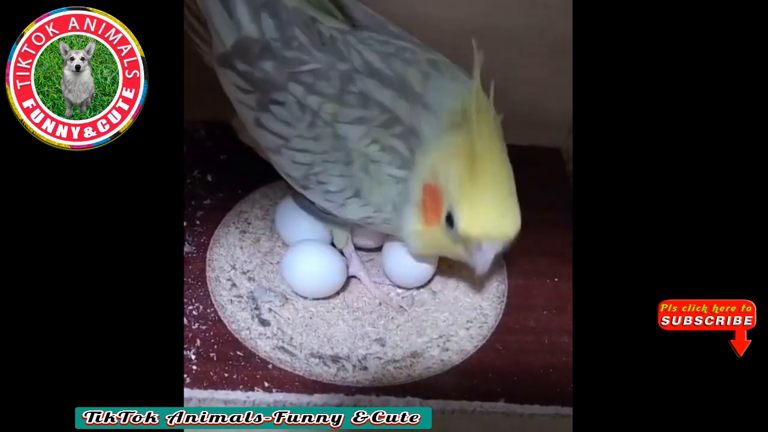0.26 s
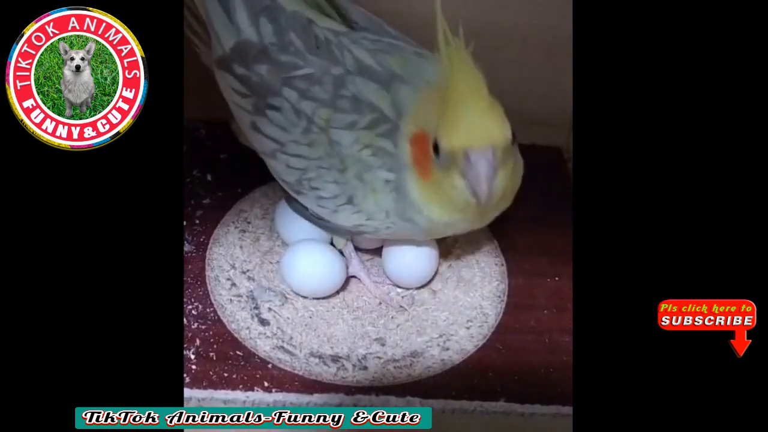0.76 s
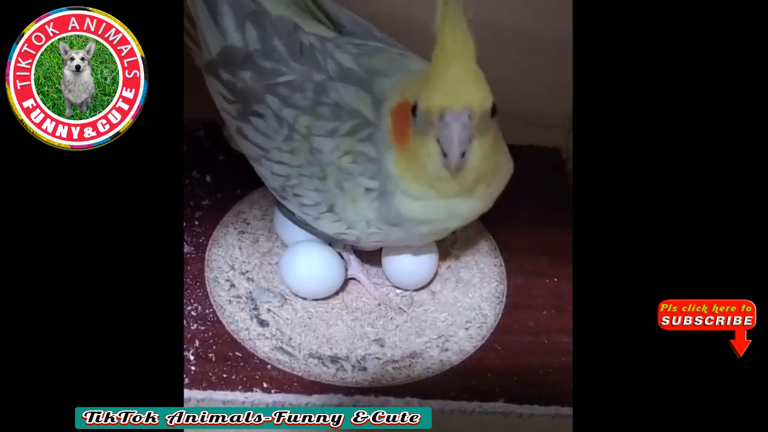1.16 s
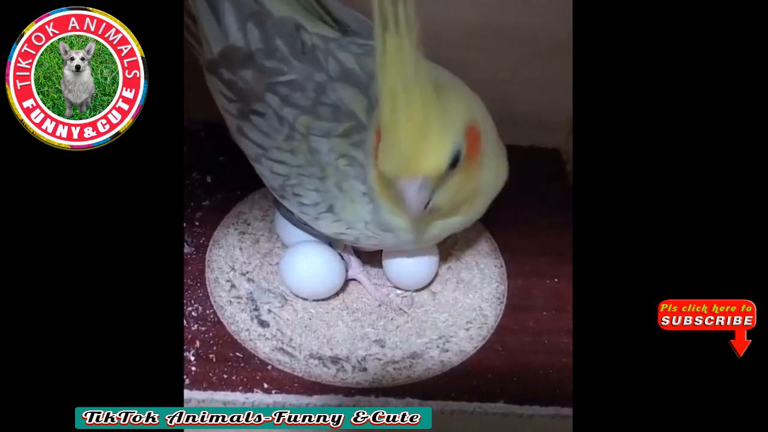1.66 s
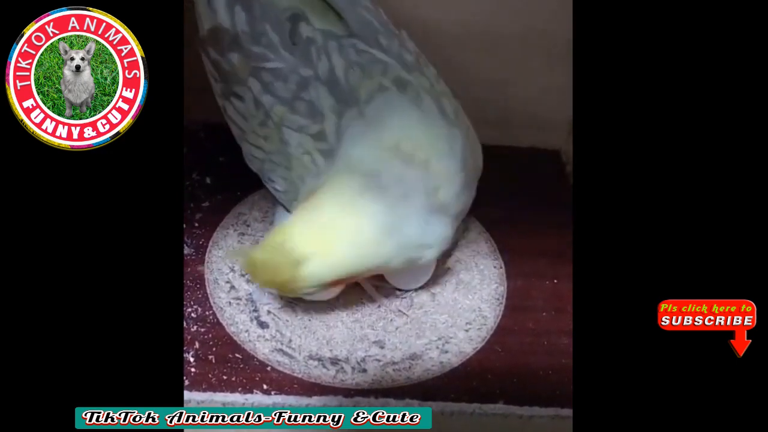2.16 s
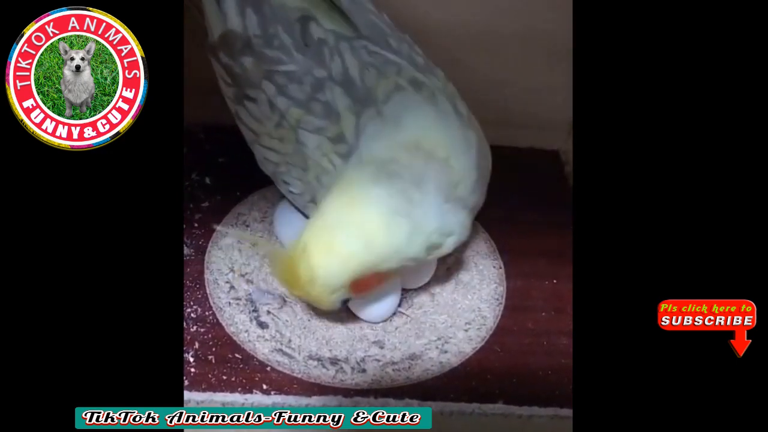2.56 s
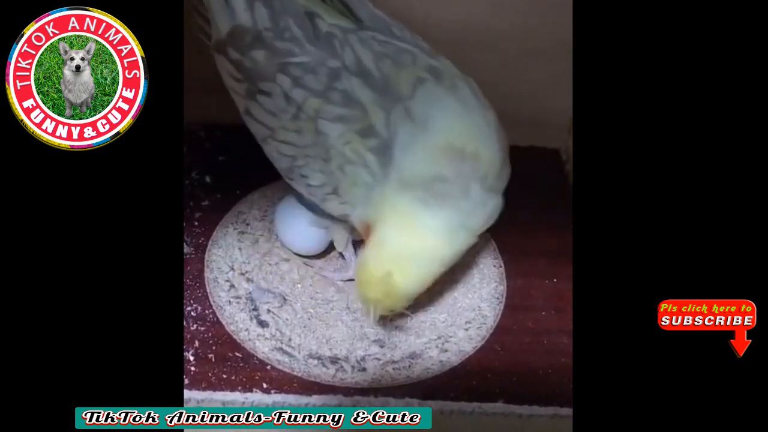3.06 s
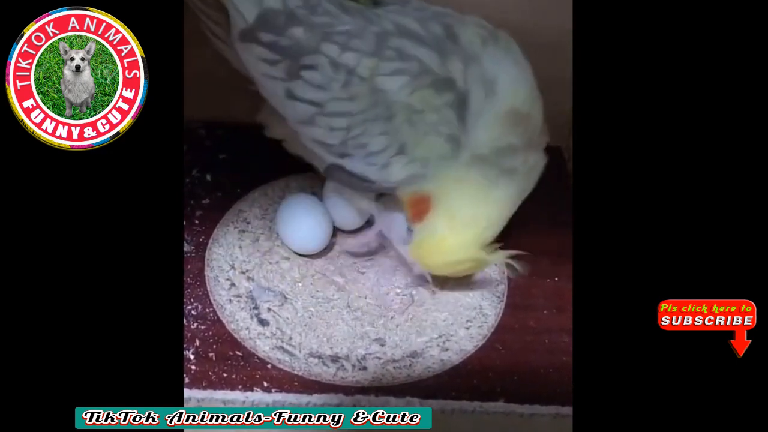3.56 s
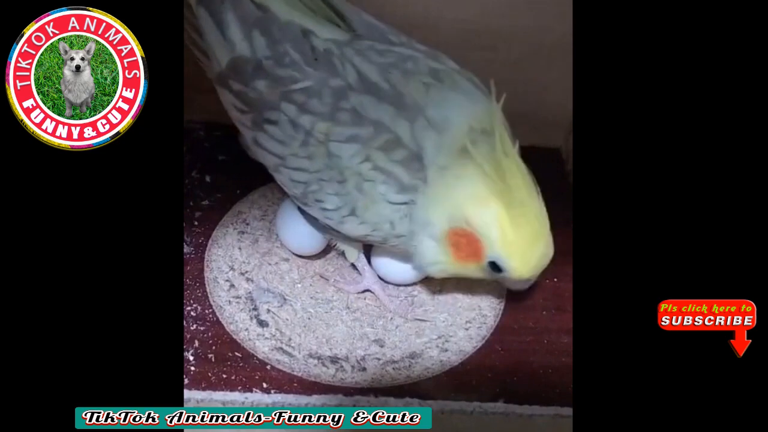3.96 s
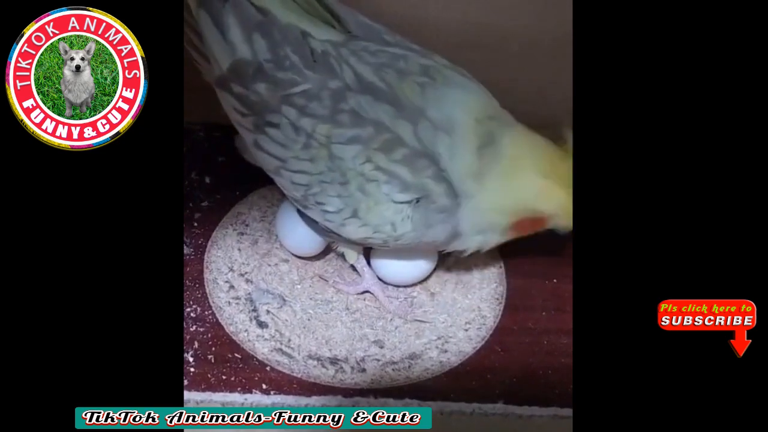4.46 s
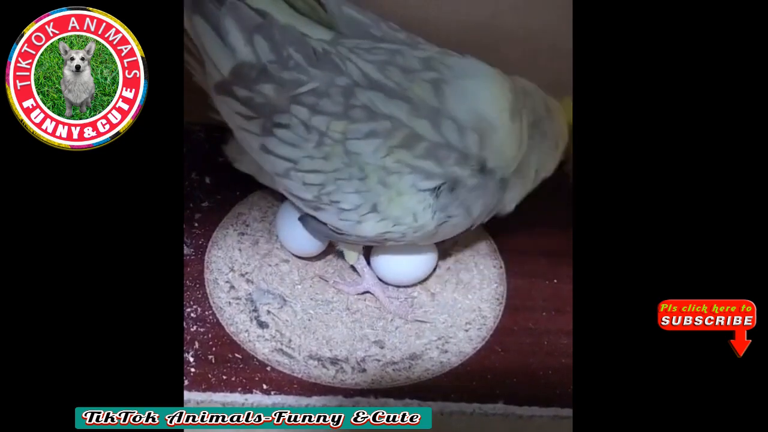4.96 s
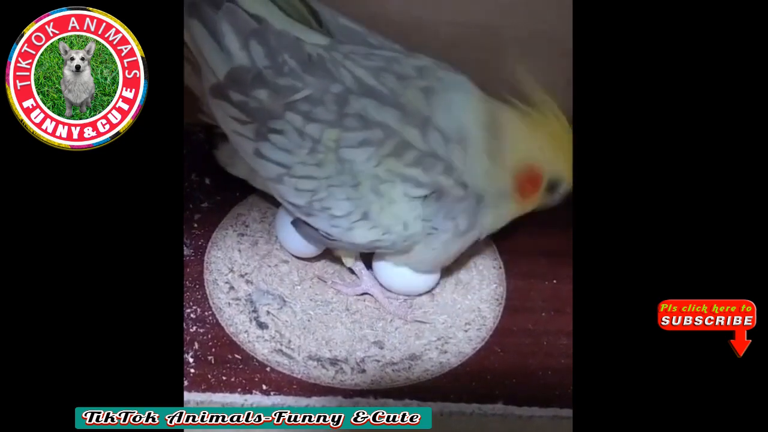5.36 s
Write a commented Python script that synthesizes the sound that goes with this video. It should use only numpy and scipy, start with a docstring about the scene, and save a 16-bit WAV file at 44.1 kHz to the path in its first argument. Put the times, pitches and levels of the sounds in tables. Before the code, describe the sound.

Short rising bird chirps, some leaping into piercing whistles, pause for over a second of quiet shuffling and clicks, then return briefly.

```python
"""A small, hard-walled room where a cockatiel chatters over its eggs, heard close up in stereo.
Each chirp is a gliding syrinx tone with overtones, and its own share of half-pitch buzz, rasp and hiss.
Decaying noise bursts with ringing tones make the beak and claw taps and the dull knocks on the stone slab.
Filtered noise makes the soft low thumps and, flickering, the foot scuffs and feather rustle,
over a faint hum and air."""
import sys
import numpy as np
from scipy import signal
from scipy.fft import rfft, irfft
from scipy.io import wavfile
from scipy.ndimage import uniform_filter1d

SR = 44100
rng = np.random.default_rng(int(sys.argv[2]) if len(sys.argv) > 2 else 0)


def bounce(signal):
    """Save signal as a 16-bit WAV file at the path given by the first command-line argument."""
    frames = np.transpose(np.atleast_2d(signal))
    limited = np.clip(frames, -1, 1)
    pcm = np.round(limited * 32767).astype(np.int16)
    wavfile.write(sys.argv[1], SR, pcm)


N = 247394
T = np.arange(N) / SR  # t/s
TOP_HZ = 15700  # the top is cut above this
AIR_DB = -75  # rms
HUM_HZ, HUM_DB = 76, -73

# Chirps, one row per note; some climbs leap into a whistle near 3 kHz. Levels come before the cockatiel() trims:
# [start t/s, full voice t/s, turn of the glide t/s, end t/s, start f/Hz, turn f/Hz, end f/Hz, level/dB,
#  against that level: soft lead-in level/dB, change by the end level/dB, second harmonic level/dB,
#  third level/dB, all higher ones level/dB, half-pitch lines level/dB;
#  undertone against the half-pitch lines level/dB, pitch flutter as a share of pitch, rasp level/dB]
CHIRPS = [ (-.02, -.012, 0, .015, 2280, 2260, 2000, -30, -9, -8, -2, -14, -28, -23, -26, .022, -22),
          (.048, .104, .155, .208, 1477, 1768, 1750, -21.5, -7, 0, -34, -43, -39, -31, -11, .01, -43),
          (.32, .35, .39, .4, 1361, 1913, 1913, -19, -9, -1, -13, -38, -30, -25, -28, .021, -32),
          (.52, .537, .576, .607, 1701, 2316, 2312, -20.5, -7, -7, 1, -5, -20, -44, -24, .005, -54),
          (.724, .735, .768, .797, 1748, 2377, 2452, -21.5, -6, -6, 3, -3, -19, -42, -17, .006, -42),
          (.826, .836, .877, .881, 1640, 2442, 2442, -20.5, -6, 0, -3, -8, -3, -24, -24, .02, -26),
          (.881, .89, .937, .994, 2844, 3216, 2855, -12.6, -8, 2, -17, -14, -23, -43, -8, .014, -33),
          (.99, .994, 1.01, 1.041, 2250, 2099, 1835, -19.5, -7, -4, -18, -15, -15, -22, -16, .031, -21),
          (1.065, 1.098, 1.128, 1.135, 1562, 2242, 2242, -19.3, -6, -0.5, -7, -13, -13, -16, -26, .026, -23),
          (1.135, 1.152, 1.175, 1.222, 2483, 2885, 2992, -16, -2, -4, -19, -16, -26, -24, -23, .015, -24),
          (1.215, 1.229, 1.236, 1.31, 2415, 2202, 1750, -15.2, -7, -7, -9, -15, -17, -23, -26, .027, -25),
          (1.436, 1.455, 1.497, 1.525, 1500, 1749, 1820, -19.4, -7, -10, -15, -39, -35, -24, -10, .013, -41),
          (1.628, 1.644, 1.671, 1.702, 1493, 1492, 1380, -19.5, -10, -9, -14, -30, -23, -18, -10, .01, -32),
          (1.853, 1.883, 1.896, 1.918, 1350, 1485, 1519, -21, -10, -9, -18, -30, -29, -17, -17, .013, -29),
          (2.098, 2.122, 2.148, 2.16, 1436, 1677, 1620, -21.5, -8, -2, 0, -17, -21, -27, -18, .011, -25),
          (2.294, 2.31, 2.319, 2.38, 2072, 2280, 2110, -20.5, -11, -6, 1, -12, -24, -48, -19, .005, -55),
          (2.5, 2.528, 2.56, 2.581, 1768, 2408, 2607, -17.7, -5, -4, -2, -6, -8, -24, -26, .02, -27),
          (2.581, 2.592, 2.648, 2.712, 2800, 3300, 2819, -12.8, -9, 2, -16, -13, -22, -42, -16, .016, -32),
          (2.716, 2.745, 2.763, 2.825, 1862, 2283, 2214, -23, -3, -2, -1, -12, -17, -29, -14, .01, -19),
          (2.958, 2.988, 3.042, 3.05, 1520, 1917, 1917, -19.5, -8, 0.5, -28, -36, -32, -25, -12, .014, -40),
          (3.189, 3.211, 3.215, 3.26, 1615, 1719, 1400, -20, -8, -2, -14, -37, -27, -21, -25, .015, -28),
          (3.411, 3.438, 3.456, 3.483, 1427, 1666, 1635, -21.5, -7, -2, -3, -21, -20, -24, -17, .008, -27),
          (4.808, 4.821, 4.826, 4.885, 1470, 1306, 1249, -27.5, -12, -12, -15, -38, -32, -25, -14, .015, -36),
          (4.973, 4.992, 5.039, 5.05, 1616, 2032, 2032, -22.2, -9, -1, 4, -4, -10, -36, -28, .011, -25),
          (5.08, 5.103, 5.173, 5.18, 1580, 2480, 2480, -17.5, -10, -2, -6, -13, -9, -19, -39, .04, -22),
          (5.17, 5.184, 5.215, 5.316, 2850, 3110, 2900, -13.3, -4, -5, -17, -15, -25, -17, -44, .01, -19),
          (5.357, 5.375, 5.428, 5.47, 1833, 2627, 2450, -23.5, -5, -6, 3, -5, -14, -18, -23, .025, -19)]
# Windpipe resonances, which favour the harmonics gliding through them: [f/Hz, level/dB]
WINDPIPE = [(1300, -3), (1500, 0), (1750, -2.5), (2300, 3.5), (3050, 4.3), (3450, -1), (3900, 5.7),
            (5300, 4.4), (6600, -4), (7500, -10), (9500, 1)]
# Throat and open beak, shaping high overtones and rasp: [f/Hz, relative level/dB]
THROAT = [(1250, -27), (1700, 5.5), (2400, -0.5), (3000, -0.5), (4500, 4.5), (6500, -1.5), (8000, -4.5),
          (9600, 0), (11000, -2), (12500, -5), (15500, -13)]
# Beak hiss that goes with the highest overtones: [f/Hz, relative level/dB]
HISS = [(5400, -7.5), (6800, 3), (8200, -5.5), (10500, 2.5), (12500, 1), (14000, -5.5), (15500, -13)]
# Mouth cavity over the whole voice, with a hollow near 8 kHz: [f/Hz, level/dB]
MOUTH = [(500, -2), (1100, -6), (1450, 0.5), (6800, -0.5), (7500, -3), (8300, -5.5), (9200, -1),
         (12800, -1.5), (14200, -4), (16000, -3)]
# Beak and claw taps: [t/s, tick peak level/dB]
TAPS = [(.254, -31), (3.983, -48), (4.572, -27), (4.619, -25), (4.752, -46), (4.836, -39), (4.931, -40)]
# Colour of the bright tick: [f/Hz, relative level/dB]
TAP_COLOUR = [(700, -24), (1500, -19.5), (3000, -13.5), (3800, -17), (4800, -6), (7000, -3.5),
              (10400, -0.5), (15500, -14.5)]
# Ring of the slab under a tap: [f/Hz, level against the tick's peak/dB, decay t/s]
TAP_MODES = [(796, -28, 0.0224), (1350, -25.5, 0.02), (2973, -32, 0.0078)]
# Dull knocks of eggs and feet on the slab: [t/s, thud peak level/dB, hollow ring level before its envelope/dB,
#  ring f/Hz]
KNOCKS = [(.16, -37, -33, 692), (.205, -35.5, -33.5, 742), (.267, -35, -43, 703),
          (3.915, -35, -45.5, 449.4), (3.944, -59, -52, 388), (4.014, -44, -54, 339.5),
          (4.062, -64, -49, 693), (4.234, -61, -52, 575), (4.29, -67, -58.5, 560.5),
          (4.438, -66, -59.5, 532), (5.562, -40, -32.5, 676.6)]
# Colour of the thud: [f/Hz, relative level/dB]
KNOCK_COLOUR = [(150, -18), (330, -8), (450, 0), (800, -2), (1300, -9), (3000, -30)]
# Soft low thumps, perhaps from handling: [start t/s, held t/s, level/dB]
THUMPS = [(.29, 0.043, -60), (1.48, .04, -67), (1.81, .04, -64), (2.28, 0.11, -62), (2.85, .1, -59),
          (3.2, 0.056, -63.5), (3.46, .04, -71.5), (4.94, .055, -44), (5.02, .07, -55.5),
          (5.55, 0.051, -55)]
# Colour of the thumps: [f/Hz, relative level/dB]
THUMP_COLOUR = [(18, -45), (30, -27), (134, 0), (216, 0), (262, -20), (308, -17), (400, -15.5),
                (520, -49.5), (880, -120)]
# Feet scuffing on the slab: [start t/s, held t/s, level/dB]
SCUFFS = [(0, 0.086, -56), (.2, 0.26, -48.5), (1.04, 0.025, -61), (1.48, 0.52, -67.5), (2.1, 0.37, -72),
          (2.84, .07, -46.5), (2.95, 0.33, -56.5), (3.33, .08, -57.5), (3.5, 0.19, -64.5),
          (3.92, 0.061, -60), (5.2, .03, -57.5), (5.5, .05, -53.5), (5.57, 0.027, -47)]
# Colour of the scuffs: [f/Hz, relative level/dB]
SCUFF_COLOUR = [(200, -18.5), (350, -6.5), (700, -2), (1100, -9.5), (2500, -17)]
# Feathers brushing: [start t/s, held t/s, level/dB]
FEATHERS = [(0, .2, -66), (.225, 0.012, -59), (1.76, .1, -68), (2.0, 0.086, -50), (3.42, .16, -49.5),
            (3.62, 0.074, -68), (4.18, .13, -65.5), (4.4, 0.028, -63.5), (4.88, 0.22, -62),
            (5.45, 0.14, -47)]
# Colour of the feathers: [f/Hz, relative level/dB]
FEATHER_COLOUR = [(1180, -72.5), (2000, -33), (4180, -16), (4550, -29.5), (4920, -15.5), (8440, -5.5),
                  (10100, -10), (15500, -17.5)]
# Colour of the air noise: [f/Hz, relative level/dB]
AIR = [(15, -37), (25, -8), (71, 7.5), (257, -8), (318, 1.5), (604, -15.5), (709, -16.5), (1540, -23.5),
       (4750, -24), (7280, -22), (15000, -26.5)]
# Reverb time by band, held within 0.2 to 0.7 s when used: [f/Hz, time to fall 60 dB t/s]
ROOM_T60 = [(300, 0.45), (1500, .5), (3000, .5), (5000, 0.42), (10000, -2.3), (15000, 0.6)]
# Direct sound against the room's: [f/Hz, level/dB]
DIRECT = [(300, 5), (700, -2.5), (1500, -9), (3000, -7.5), (6000, -8.5), (9500, -1), (12000, -5),
          (15000, -3.5)]
# Likeness of diffuse sound at the two microphone ports, held within +-0.98: [f/Hz, correlation]
LIKENESS = [(150, 1.66), (500, -0.35), (1500, 0.04), (4500, -0.14), (6500, 0.53), (9500, 0.9),
            (14000, 0.65)]
# Stereo lean of the ports, left minus right: [f/Hz, level/dB]
PORTS = [(60, -3), (110, 2), (200, 4.5), (380, -0.5), (700, -2), (1290, -1), (2380, -1.5), (4400, -2.5),
         (8120, 1), (15000, 5)]


def cockatiel(edge_s=.009, flutter_hz=300, shimmer=.1, rattle=.95, voice_db=1, half_fall_db=-3,
              jitter=.0065, clear_db=1, hiss_db=-6):
    """A fluttering syrinx tone; unequal alternate cycles add half-pitch lines, turbulence adds rasp and hiss."""
    pitch, level_db, second_db, third_db, upper_db = syrinx()
    gate, half, under, flutter, rasp = np.zeros((5, N))
    for start, _, _, end, *_, half_db, under_db, spread, rasp_db in CHIRPS:
        edges = np.clip(np.minimum(T - start, end - T) / edge_s + .5, 0, 1)
        note = np.sin(np.pi / 2 * edges) ** 2
        gate = np.minimum(gate + note, 1)
        half = half + note * undb(half_db)
        under = under + note * undb(under_db)
        flutter = flutter + note * spread
        rasp = rasp + note * undb(rasp_db)

    phase = 2 * np.pi * np.cumsum(pitch * (1 + flutter * wobble(flutter_hz))) / SR
    tone = 0
    for k, db in enumerate((0, second_db, third_db), 1):
        tone = tone + undb(db + at(WINDPIPE, k * pitch)) * np.sin(k * phase)

    # the membranes never close twice alike, which smears the high overtones
    ragged = phase + 2 * np.pi * np.cumsum(pitch * jitter * wobble(700)) / SR
    orders = np.arange(4, 12)[:, None]
    overtone_hz = orders * pitch
    weights = undb(at(THROAT, overtone_hz)) / orders * (overtone_hz < TOP_HZ)
    upper = (weights * np.sin(orders * ragged)).sum(axis=0) / np.linalg.norm(weights, axis=0)

    # half-pitch lines lie between the harmonics and fade upwards
    buzz = under * np.sin(phase / 2)
    for k in range(1, 5):
        buzz = buzz + undb(half_fall_db * (k - 1)) / k * np.sin((k + .5) * phase)

    # turbulence puffs once per cycle
    puffs = rng.standard_normal(N) * (1 + np.cos(phase))
    hiss = unit(colour(puffs, HISS)) / np.sqrt(2)
    top = undb(clear_db) * upper + undb(hiss_db) * hiss
    voice = tone + half * buzz + undb(upper_db) * top + rasp * unit(colour(puffs, THROAT))

    # in raspy chirps the swing itself beats unevenly, throwing sidebands round each line
    unevenness = unit(colour(rng.standard_normal(N), [(250, 0.0011), (600, 0.00065)]))
    swing = 1 + shimmer * wobble(110) + rattle * rasp * unevenness
    return colour(gate * undb(level_db + voice_db) * voice * swing, MOUTH)


def syrinx(open_s=.0015):
    """Each note opens from a soft lead-in, glides in an S, then bends to its end; gives pitch and level controls."""
    controls, busy_until = np.zeros((5, N)), -1
    for (start, full, crest, end, start_hz, crest_hz, end_hz, db, lead_db, end_db,
         second_db, third_db, upper_db, *_) in CHIRPS:
        rise = np.sin(np.pi / 2 * np.clip((T - start) / max(crest - start, 1e-3), 0, 1)) ** 2
        sag = np.clip((T - crest) / max(end - crest, 1e-3), 0, 1) ** 2
        closed = (1 - np.tanh((T - full) / (2 * open_s))) / 2
        pitch = start_hz + (crest_hz - start_hz) * rise + (end_hz - crest_hz) * sag
        level_db = db + lead_db * closed + end_db * sag
        # a note takes over just before it sounds, but never inside the note before
        first = np.searchsorted(T, max(start - .01, busy_until))
        controls[:2, first:] = pitch[first:], level_db[first:]
        controls[2:, first:] = [[second_db], [third_db], [upper_db]]
        busy_until = end
    return uniform_filter1d(controls, size=SR // 250, axis=1)  # 4 ms glide between settings


def taps(tick_s=0.0041):
    """Hard, bright ticks of beak and claws that set the slab ringing."""
    out = 0
    for s, db in TAPS:
        tick = colour(strike(s, decay_s=tick_s), TAP_COLOUR)
        age = np.maximum(T - s, 0)
        ring = 0
        for hz, mode_db, decay in TAP_MODES:
            ring = ring + undb(mode_db) * np.sin(2 * np.pi * hz * age) * np.exp(-age / decay)
        out = out + undb(db) * (tick / np.abs(tick).max() + ring)
    return out


def knocks(thud_s=0.0055, ring_s=0.019, swell_s=0.0044):
    """Dull knocks on the slab, each with a brief hollow ring that swells and dies."""
    out = 0
    for s, thud_db, ring_db, hz in KNOCKS:
        thud = colour(strike(s, decay_s=thud_s), KNOCK_COLOUR)
        age = np.maximum(T - s, 0)
        envelope = np.exp(-age / ring_s) * (1 - np.exp(-age / swell_s))
        ring = np.sin(2 * np.pi * hz * age) * envelope
        out = out + undb(thud_db) * thud / np.abs(thud).max() + undb(ring_db) * ring
    return out


def strike(s, decay_s):
    """A short burst of contact noise starting at s."""
    age = np.maximum(T - s, 0)
    return (T >= s) * np.exp(-age / decay_s) * rng.standard_normal(N)


def movement():
    """Soft low thumps, scuffing feet and rustling feathers, all shaped from noise."""
    thumps = rub(THUMP_COLOUR, strokes(THUMPS, attack_s=.018, release_s=.04), grain_db=0)
    scuffs = rub(SCUFF_COLOUR, strokes(SCUFFS, attack_s=0.0092, release_s=.06), grain_db=2.5)
    feathers = rub(FEATHER_COLOUR, strokes(FEATHERS, attack_s=0.017, release_s=0.032), grain_db=2)
    return thumps + scuffs + feathers


def rub(points, gain, grain_db):
    """Coloured noise; above 0 dB of grain it catches and slips, so that its level flickers."""
    return unit(colour(diffuse(N) * undb(grain_db * wobble(60)), points)) * gain


def strokes(table, attack_s, release_s):
    """Gain of a series of strokes: each swells up to its start, holds and dies away."""
    gain = 0
    for s, length, db in table:
        swell = np.minimum(T - s, 0) / attack_s
        fall = np.maximum(T - s - length, 0) / release_s
        gain = gain + undb(db) * np.exp(swell - fall)
    return gain


def hum():
    """A faint low tone whose level wavers slowly."""
    return undb(HUM_DB) * (1 + 0.42 * wobble(6)) * np.sin(2 * np.pi * HUM_HZ * T)


def air():
    """Steady coloured noise from all sides."""
    return undb(AIR_DB) * unit(colour(diffuse(N), AIR))


def room(x, first_wall_s=.004, build_s=0.0027):
    """Direct sound plus dense wall echoes, each band dying at its own rate."""
    t = T[:SR * 3 // 4]
    spectrum, f = rfft(diffuse(len(t))), bins(t)
    centres = [hz for hz, _ in ROOM_T60]
    onset = 1 - np.exp(-np.maximum(t - first_wall_s, 0) / build_s)
    echoes = 0
    for (_, t60), share in zip(ROOM_T60, np.eye(len(centres))):
        fade = onset * np.exp(-np.log(1000) * t / np.clip(t60, .2, .7))
        band = irfft(spectrum * at(list(zip(centres, share)), f), len(t))
        echoes = echoes + band * fade / np.linalg.norm(fade)
    wet = signal.fftconvolve(x[None], echoes, axes=1)[:, :N]
    direct = undb(at(DIRECT, bins(x)))
    # hypot keeps the summed power of direct and room steady
    return irfft((rfft(wet) + direct * rfft(x)) / np.hypot(1, direct), N)


def diffuse(size):
    """Noise as the two ports hear it when it comes from all sides."""
    noise = rng.standard_normal((2, size))
    mid, side = rfft(noise)
    likeness = np.clip(at(LIKENESS, bins(noise)), -.98, .98)
    mid = mid * np.sqrt((1 + likeness) / 2)
    side = side * np.sqrt((1 - likeness) / 2)
    return irfft(np.array([mid + side, mid - side]), size)


def wobble(hz):
    """Random motion of rms 1, mostly slower than hz."""
    lowpass = signal.butter(2, hz, fs=SR, output="sos")
    return unit(signal.sosfilt(lowpass, rng.standard_normal(N)))


def colour(x, points):
    """Filter by (f/Hz, level/dB) points, falling steeply beyond both ends."""
    f = bins(x) + 1
    skirts = np.minimum(1, np.minimum(f / points[0][0], points[-1][0] / f)) ** 4
    return irfft(rfft(x) * undb(at(points, f)) * skirts, x.shape[-1])


def at(points, hz):
    """Read (f/Hz, value) points on a log-frequency axis."""
    f, value = np.transpose(points)
    return np.interp(np.log(np.maximum(hz, 1)), np.log(f), value)


def bins(x):
    """Frequencies of the spectrum of x, in Hz."""
    return np.fft.rfftfreq(x.shape[-1], 1 / SR)


def unit(x):
    """Scale to rms 1."""
    return x / np.sqrt(np.mean(x ** 2))


def undb(db):
    """Decibels to gain."""
    return 10 ** (np.asarray(db) / 20)


def scene():
    """Bird, taps and knocks in the room, over soft movement, a faint hum and air."""
    return room(cockatiel() + taps() + knocks()) + movement() + hum() + air()


def record(dry):
    """Each microphone port has its own colour; the top is cut steeply."""
    lean_db = at(PORTS, bins(dry)) * np.array([[.5], [-.5]])
    heard = irfft(rfft(dry) * undb(lean_db), N)
    top_cut = signal.ellip(10, .2, 80, TOP_HZ, fs=SR, output="sos")
    return signal.sosfilt(top_cut, heard)


dry = scene()
out = record(dry)
bounce(out)
```